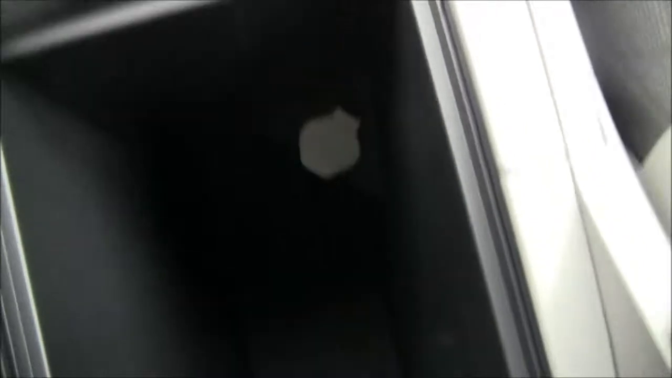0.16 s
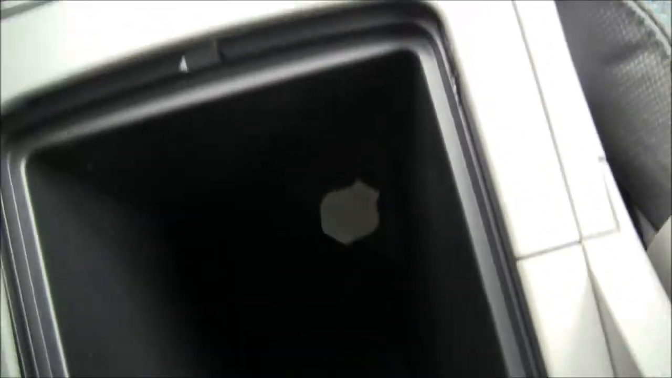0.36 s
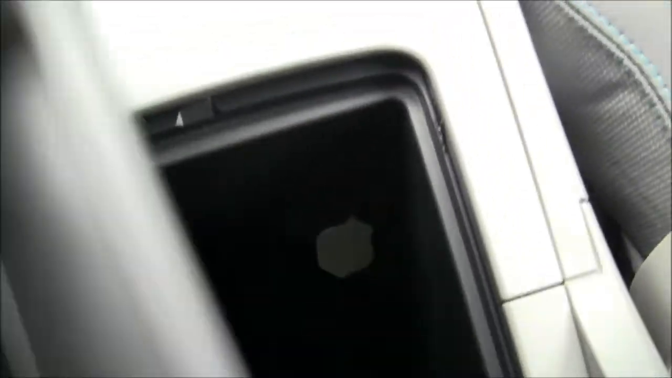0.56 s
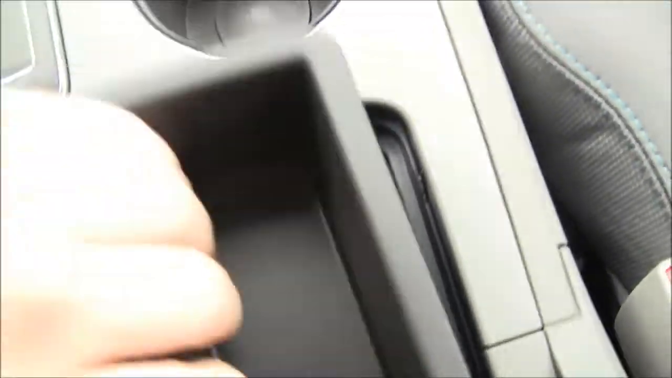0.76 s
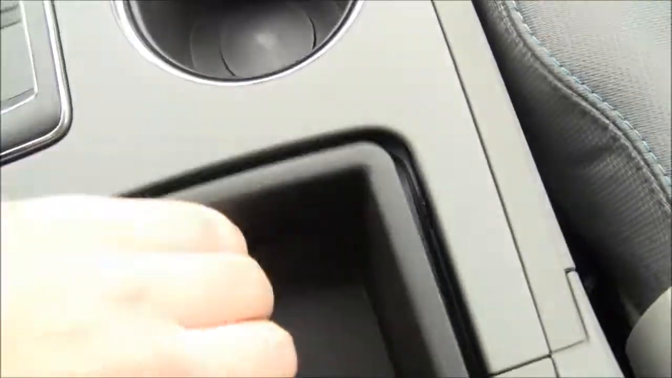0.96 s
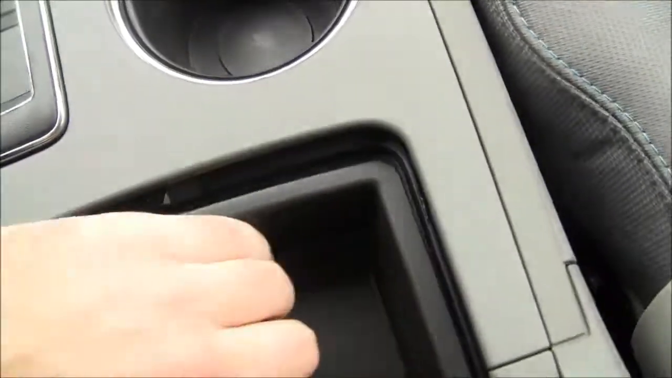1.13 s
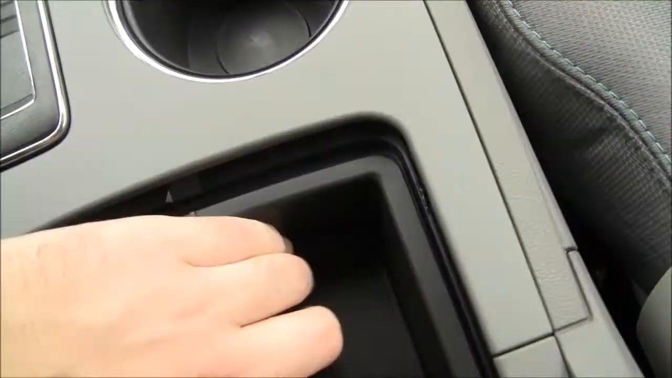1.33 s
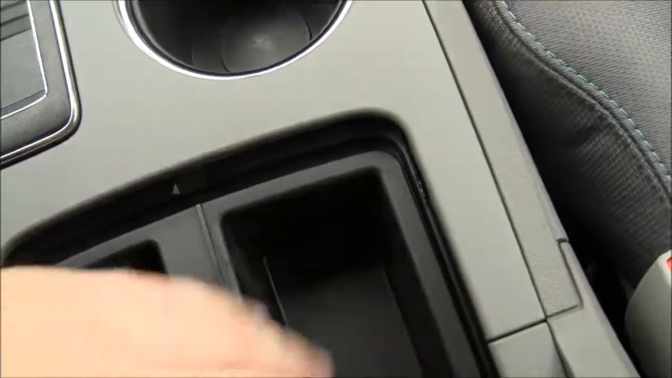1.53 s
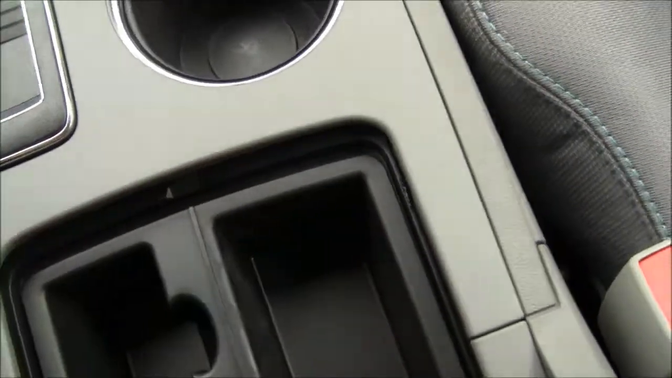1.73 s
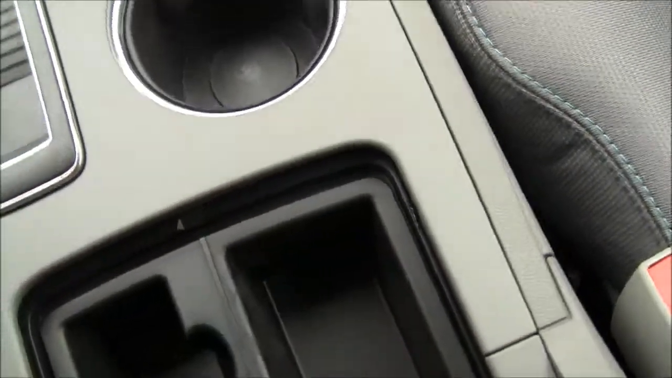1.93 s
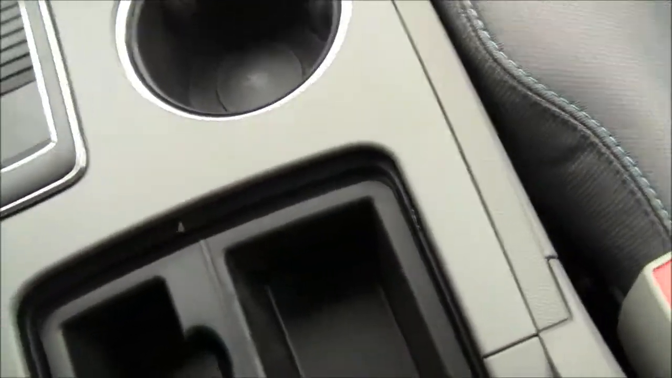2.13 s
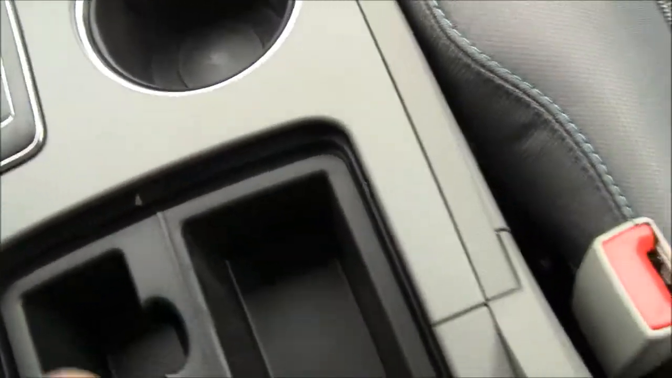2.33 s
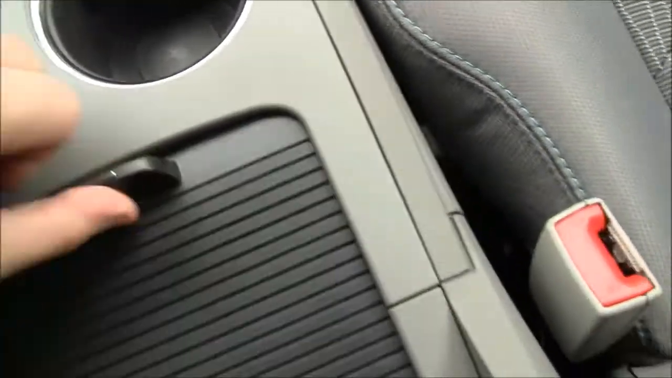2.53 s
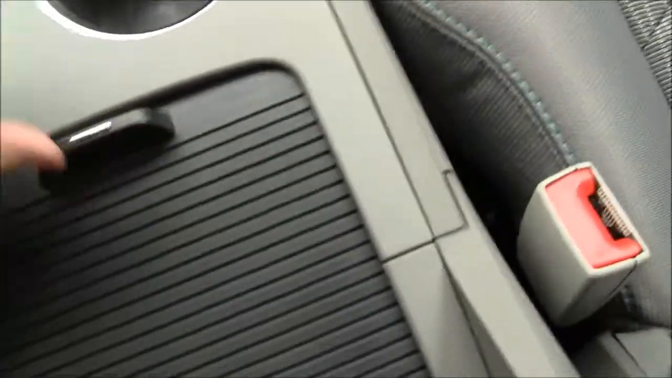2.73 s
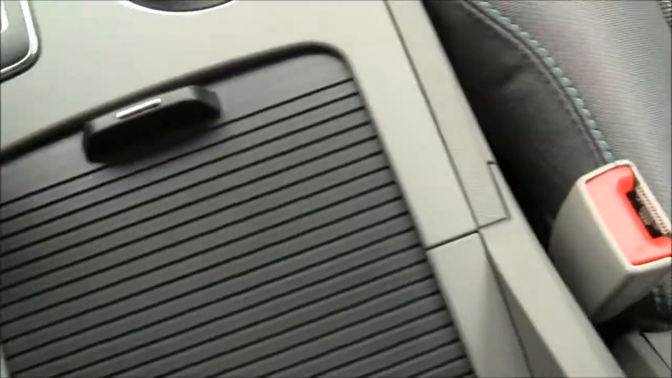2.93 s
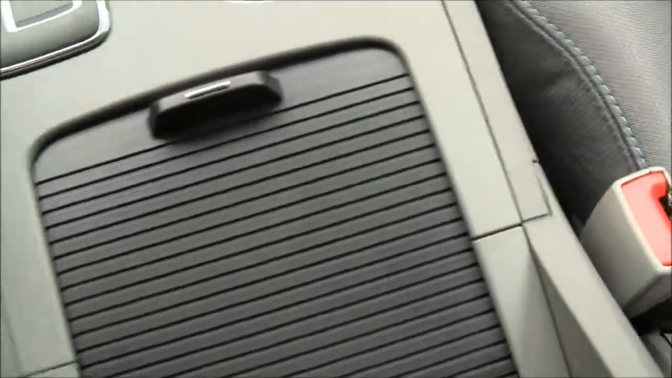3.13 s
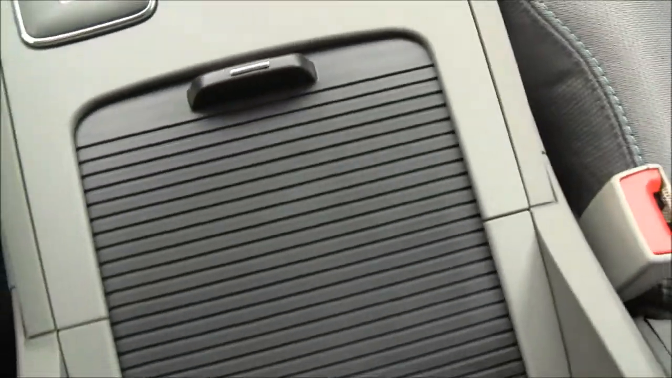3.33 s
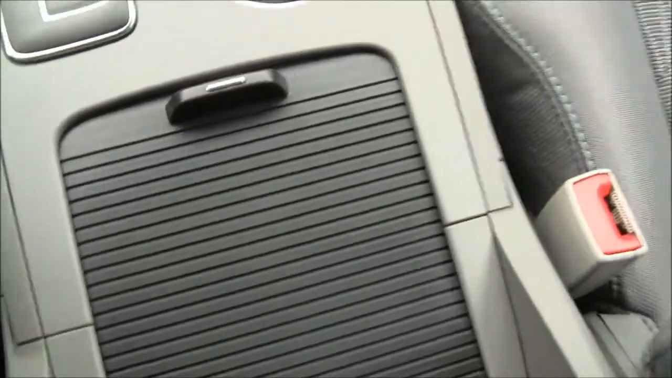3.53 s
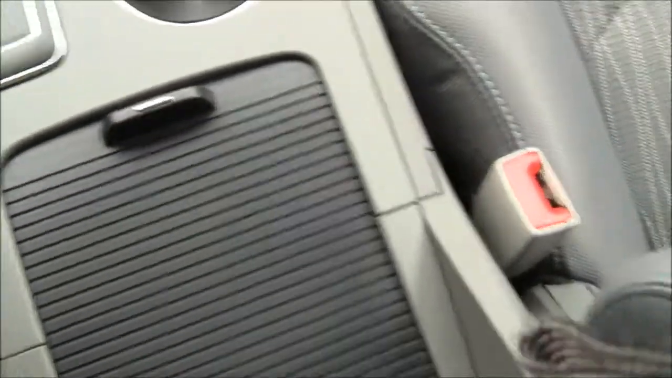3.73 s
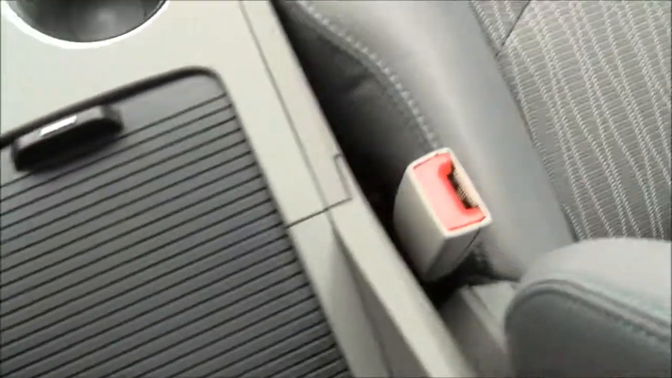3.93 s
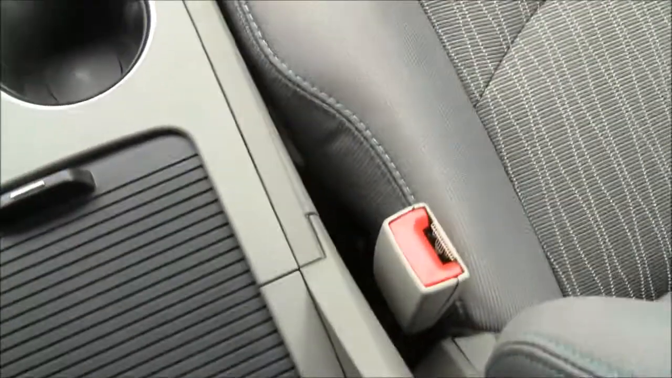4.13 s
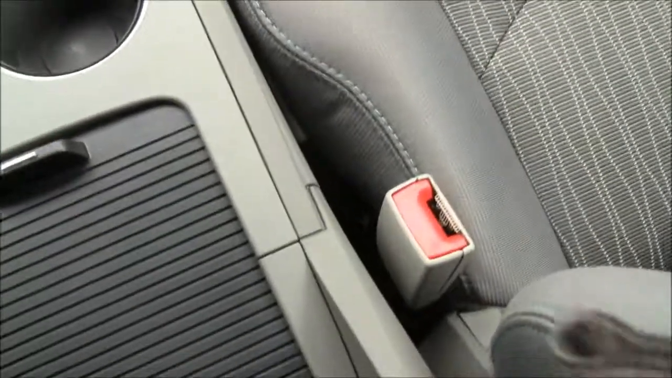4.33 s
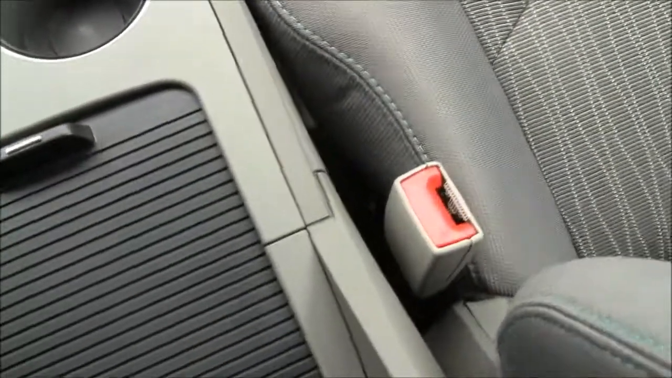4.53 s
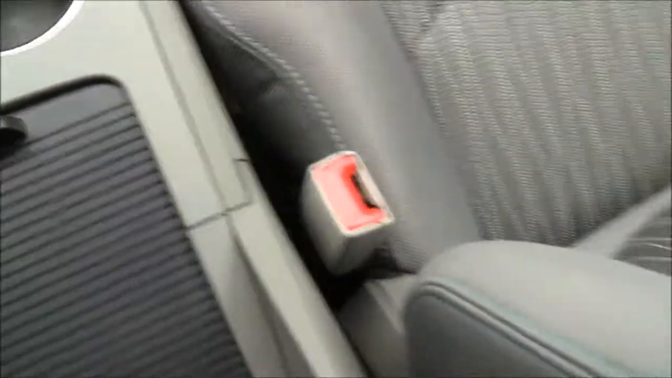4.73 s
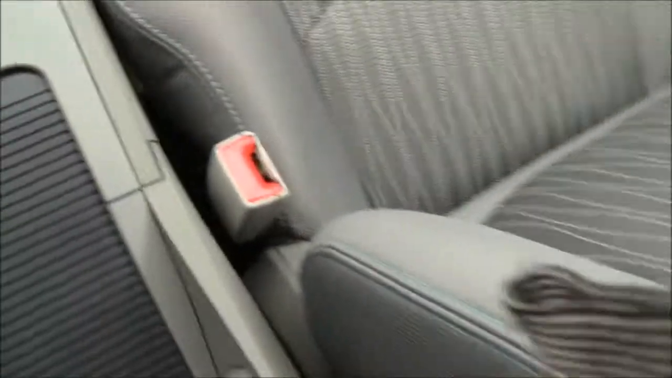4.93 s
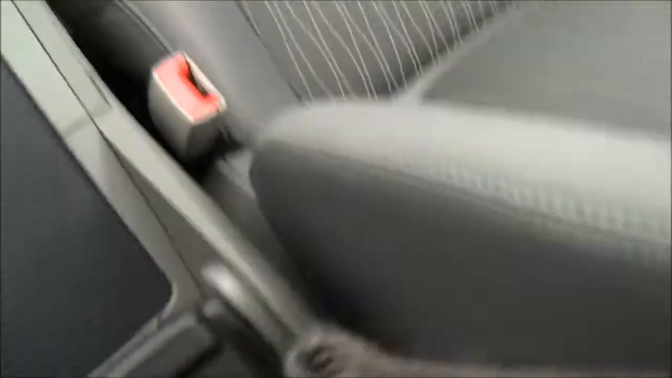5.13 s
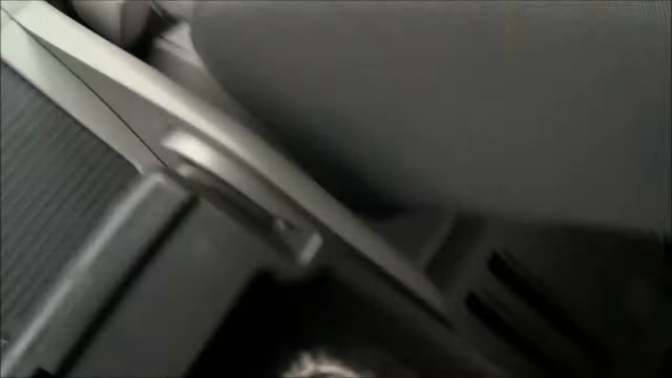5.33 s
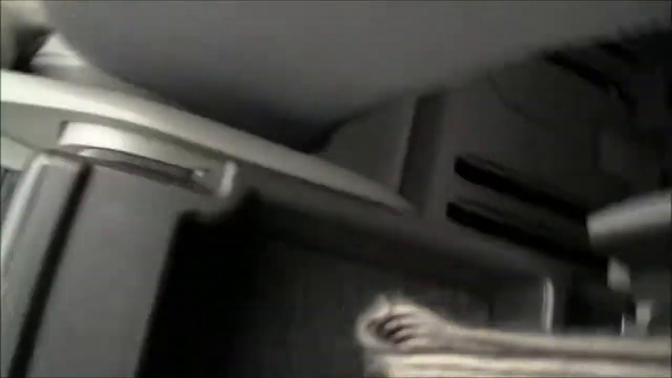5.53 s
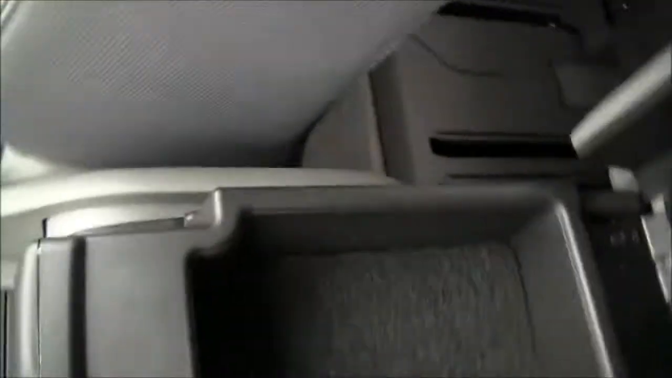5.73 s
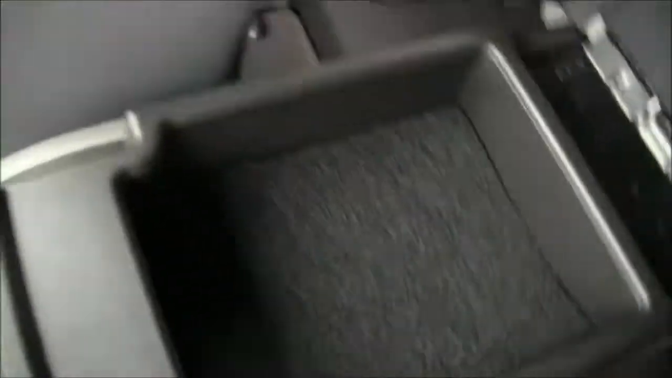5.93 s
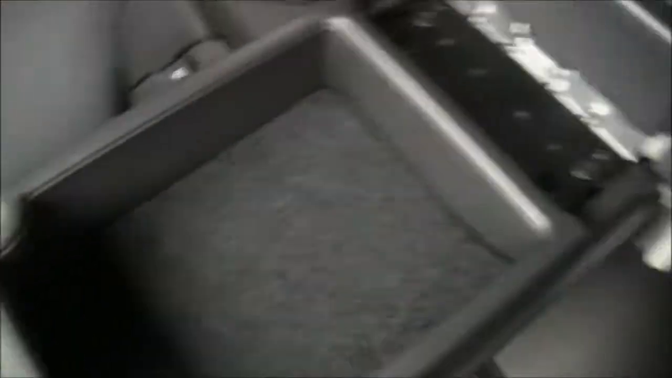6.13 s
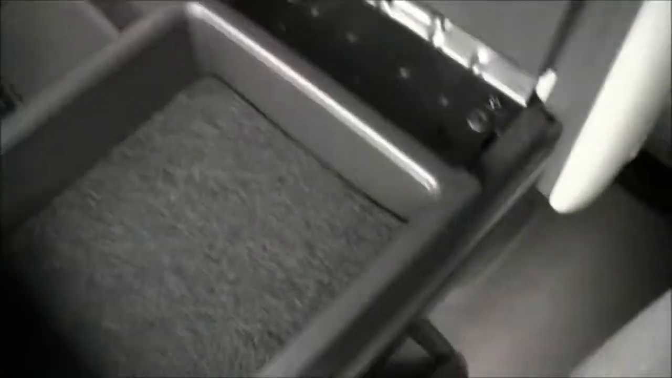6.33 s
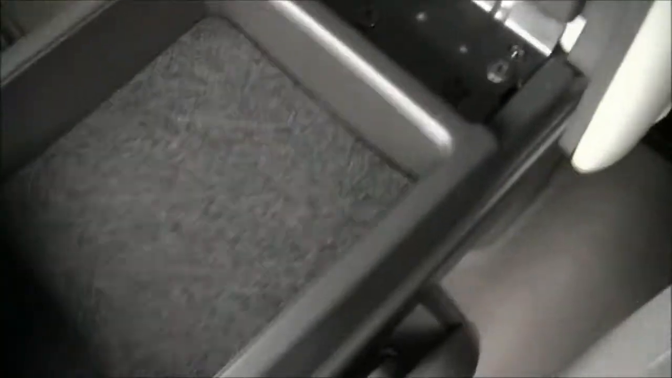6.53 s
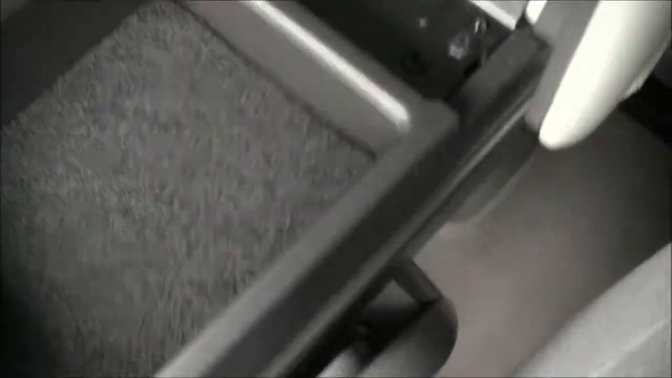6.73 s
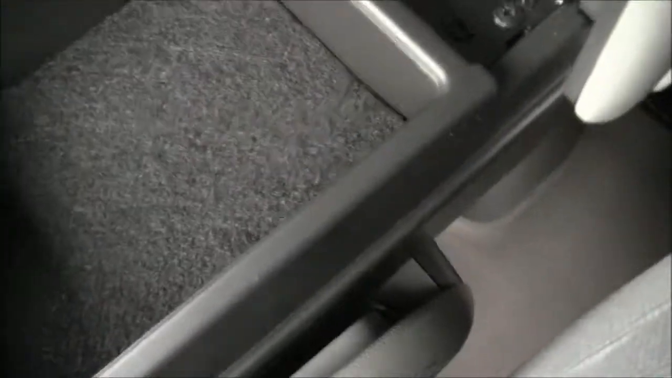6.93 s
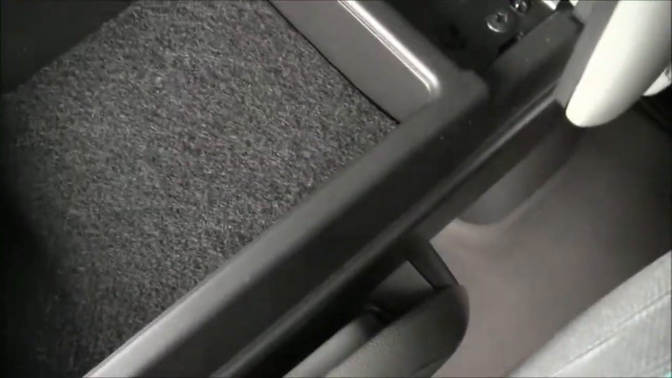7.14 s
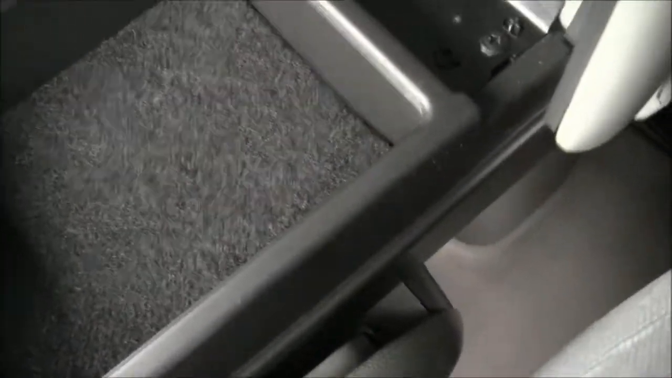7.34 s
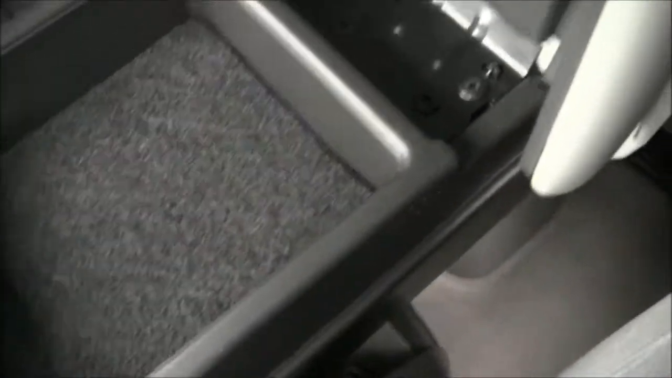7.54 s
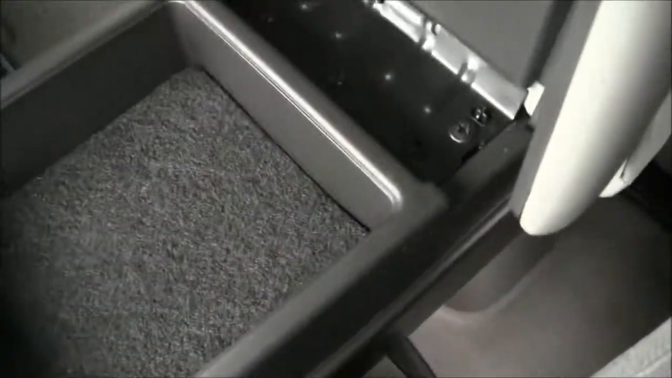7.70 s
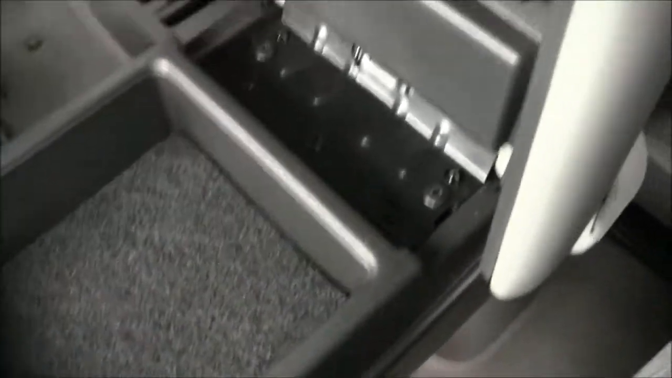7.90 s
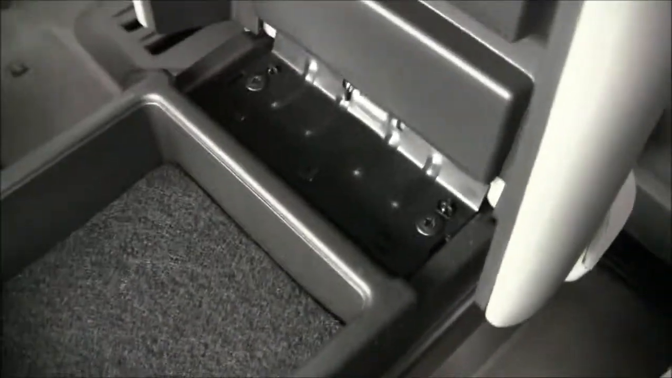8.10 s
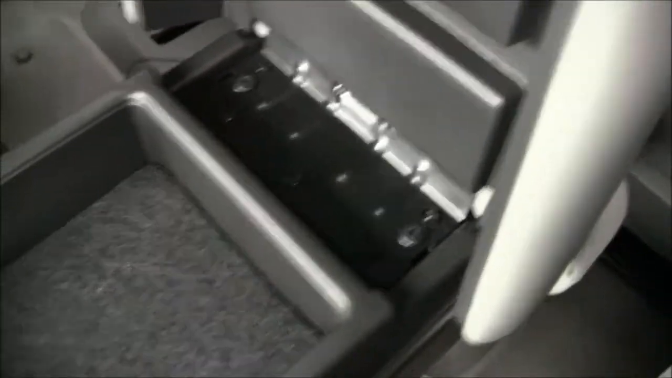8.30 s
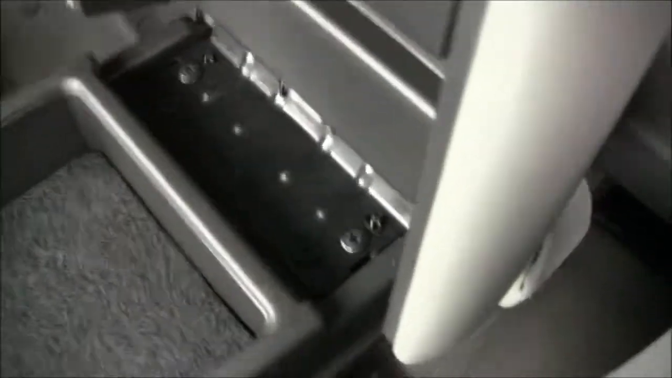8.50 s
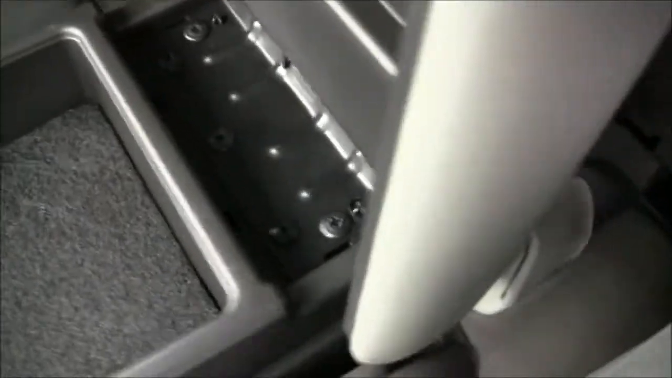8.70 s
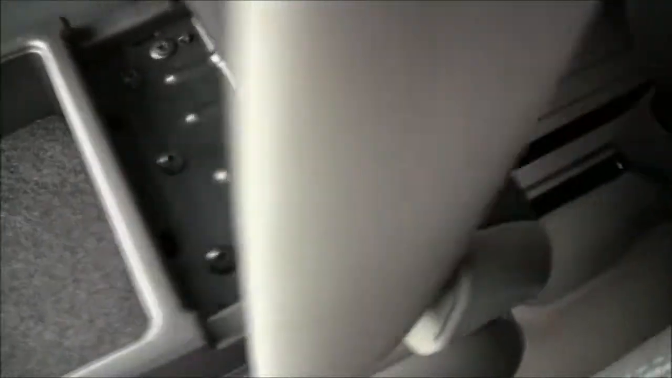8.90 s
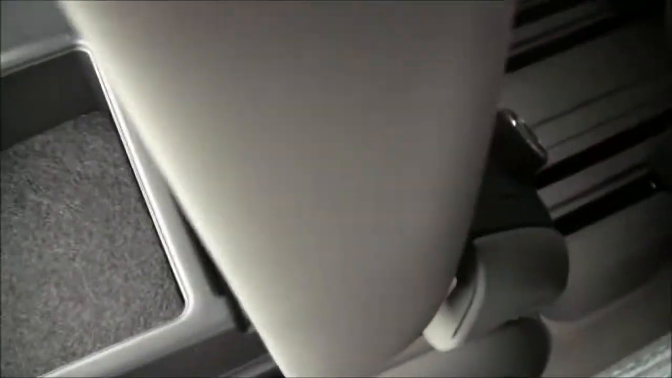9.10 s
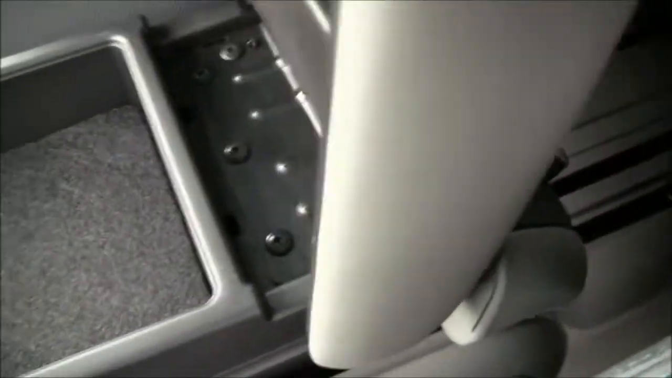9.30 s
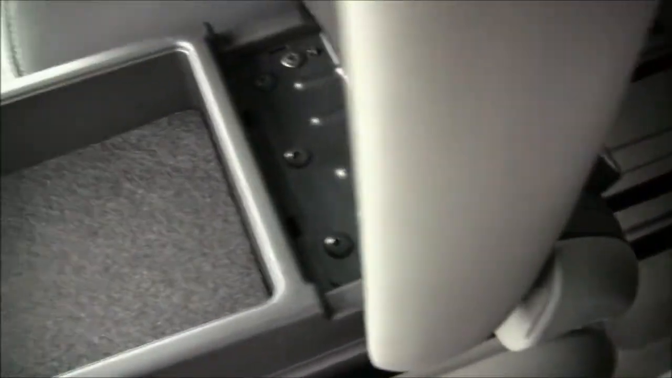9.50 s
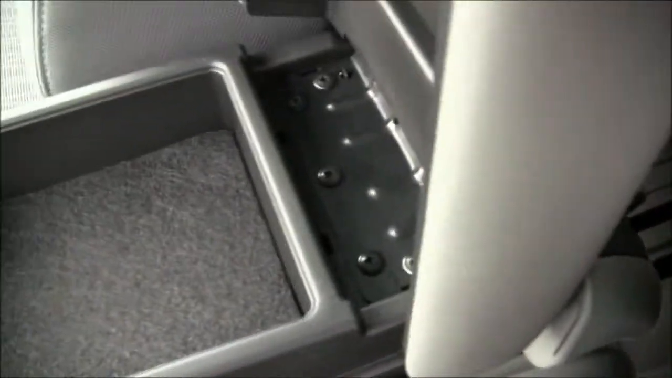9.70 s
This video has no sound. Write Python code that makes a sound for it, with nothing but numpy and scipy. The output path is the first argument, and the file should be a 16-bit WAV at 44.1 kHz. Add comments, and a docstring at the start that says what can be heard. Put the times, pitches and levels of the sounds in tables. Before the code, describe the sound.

Inside a quiet parked car, close to the microphone, a hollow plastic tray clatters and scrapes into its bin. A ribbed shutter then slides with a quick rising rattle and knocks shut. A latch snaps open with a faint springy ring, a sleeve brushes soft upholstery, and finally the armrest hinge grinds and creaks back to a heavy thud. A low, steady cabin hum continues underneath.

```python
"""A plastic centre console in a parked car, worked by hand over the low hum of the cabin.
A tray drops into its bin and is pushed home, a ribbed shutter is drawn shut, the armrest latch snaps open
and the armrest grinds back on its hinge to its stop, while a sleeve brushes the upholstery.
Blows ring panel modes with a noisy crack; rubbing is a rain of random slips into resonances;
the hum is coloured noise, and the latch spring sings in decaying sines."""
import sys
import numpy as np
from scipy import signal
from scipy.fft import rfft, irfft, next_fast_len
from scipy.io import wavfile
from scipy.ndimage import uniform_filter1d

SR = 44100
rng = np.random.default_rng(int(sys.argv[2]) if len(sys.argv) > 2 else 0)


def waveform_to_disk(signal):
    """Save audio, clipped to [-1, 1], as 16-bit WAV at the path in sys.argv[1]."""
    frames = np.transpose(np.atleast_2d(signal))
    scaled = np.clip(frames, -1, 1) * 32767
    samples = np.round(scaled).astype(np.int16)
    wavfile.write(sys.argv[1], SR, samples)


N = 434826
TIME = np.arange(N) / SR


def from_db(db):
    """Decibels to gain."""
    return np.exp(np.asarray(db) * (np.log(10) / 20))


def rms_one(x):
    """Scale to unit power."""
    return x / np.sqrt(np.mean(x ** 2) + 1e-20)


def colour(x, spectrum):
    """Shape a sound by a spectrum whose points are joined on a log-frequency axis."""
    size = next_fast_len(len(x))
    hz = np.maximum(np.fft.rfftfreq(size, 1 / SR), 1)
    points_hz, points_db = np.transpose(spectrum)
    db = np.interp(np.log(hz), np.log(points_hz), points_db)
    return irfft(rfft(x, size) * from_db(db), size)[:len(x)]


def band(x, edges, kind):
    """Causal Butterworth filter."""
    return signal.sosfilt(signal.butter(2, edges, kind, fs=SR, output="sos"), x)


def peak(x, hz, width_hz):
    """Pass one narrow resonance."""
    return signal.lfilter(*signal.iirpeak(hz, hz / width_hz, fs=SR), x)


def resonate(x, resonances):
    """Lift a few resonances out of a sound."""
    return x + sum(from_db(db) * peak(x, hz, width_hz) for hz, width_hz, db in resonances)


def drift(per_s):
    """Random wander: normally distributed points, joined by straight lines."""
    knots = rng.standard_normal(4096)
    return np.interp(TIME * per_s, np.arange(len(knots)), knots)


def gate(start, end, attack_s, release_s):
    """Rise from the start, hold until the end, then die away."""
    rise = (TIME - start) / max(attack_s, 1e-3)
    fall = 1 - (TIME - end) / max(release_s, 1e-3)
    return np.clip(np.minimum(rise, fall), 0, 1)


def push(start, end, attack_s, release_s, first_db, last_db):
    """Gain of a slide whose level runs steadily in dB until it is stopped."""
    return gate(start, end, attack_s, release_s) * from_db(np.interp(TIME, [start, end], [first_db, last_db]))


def ring(s, hz, db, t60):
    """One mode, struck once: a sine that decays exponentially."""
    t = np.clip(TIME - s, 0, 1)
    return from_db(db - 60 * t / t60) * np.sin(2 * np.pi * hz * t)


# The crowd of short, high panel modes in a blow. Each row: frequency in Hz, relative level in dB.
CRACK = [(100, -33), (400, 5.5), (1000, 0.5), (2000, -3), (4000, -7.5), (7000, -13.5), (11000, -21),
         (16000, -26.5)]


def blows(hits, modes, crack_db, crack_t60, chatter_db, thump_db, knock_db, tick_db, swell_cycles,
          contact_db, contact_s=0.00033):
    """Each blow rings the part's modes and a short crack; how hard and sharp it is sets thump, knock and tick."""
    t = TIME[:SR // 3]
    hz, mode_db, t60 = np.transpose(modes)[:, :, None]
    # a panel mode takes a moment to take up the blow
    swell = 1 - np.exp(-t * hz / swell_cycles)
    rings = from_db(mode_db - 60 * t / t60) * np.sin(2 * np.pi * hz * t) * swell
    signs = (-1) ** np.arange(len(modes))[:, None]
    # the crack dies fast and leaves a faint tail in the padded cabin
    dying = from_db(-60 * t / crack_t60) + from_db(-28 - 60 * t / .11)
    crowd = rms_one(colour(rng.standard_normal(SR), CRACK))
    # the first contact itself is one short push and its rebound
    contact = from_db(contact_db) * band(t / contact_s * np.exp(1 - t / contact_s), 500, "high")
    out = np.zeros(N + len(t))
    for s, thump, knock, tick, chatter_s, spot_hz in hits:
        strengths = signs * from_db(rng.normal(0, 1.5, signs.shape))
        # loose plastic buzzes against its seat for a moment after the first contact
        chatter = from_db(chatter_db) * np.exp(-t / max(chatter_s, 1e-4))
        crack = np.roll(crowd, rng.integers(SR))[:len(t)] * (from_db(crack_db) * dying + chatter)
        # the spot that is hit favours a resonance of its own
        body = resonate((strengths * rings).sum(0) + crack + contact, [(spot_hz, 110, 4)])
        parts = band(body, [50, 430], "band"), -band(body, [480, 1700], "band"), band(body, 2000, "high")
        levels = thump + thump_db, knock + knock_db, tick + tick_db
        for part, db in zip(parts, levels):
            # levelled by its first 25 ms
            out[round(s * SR):][:len(t)] += from_db(db) * part / np.std(part[:SR // 40])
    return out[:N]


def rub(gain, spectrum, resonances, slips_per_s, spread_db, judder_db):
    """Friction: a dense rain of tiny slips of uneven size into the part's resonances, under an unsteady hand."""
    moving, out = np.flatnonzero(gain), np.zeros(N)
    slips = rng.standard_normal(N) * (rng.random(N) < slips_per_s / SR)
    slips = slips[moving] * from_db(spread_db * np.minimum(rng.exponential(1, N)[moving], 4))
    rubbing = rms_one(resonate(colour(slips, spectrum), resonances))
    out[moving] = rubbing * from_db(judder_db * drift(90)[moving])
    return gain * out


def grit(gain, spectrum, resonances, catches_per_s, spread_db, crumble_s):
    """Stick and slip: the part catches at uneven intervals and lets go with a short crunch."""
    start, stop = np.flatnonzero(gain)[[0, -1]]
    gaps, sizes = rng.uniform(.3, 1.7, 200), rng.uniform(-1, 1, 200)
    at = (np.cumsum(gaps) / catches_per_s * SR).astype(int)
    catches, out = np.zeros(stop - start), np.zeros(N)
    inside = at < len(catches)
    catches[at[inside]] = from_db(spread_db * sizes[inside])
    decay = np.exp(-1 / (max(crumble_s, 1e-4) * SR))
    crunch = signal.lfilter([1], [1, -decay], catches) * rng.standard_normal(len(catches))
    out[start:stop] = rms_one(resonate(colour(crunch, spectrum), resonances))
    return gain * out


def glide(x, path, resonances):
    """Resonances (ratio, width Hz, dB) that move together along a path of (s, Hz), at the input's power."""
    out, size = np.zeros(N), SR // 800
    start, stop = np.flatnonzero(x)[[0, -1]]
    for ratio, width_hz, db in resonances:
        state = np.zeros(2)
        for i in range(start, stop + SR // 20, size):
            hz = ratio * np.interp(i / SR, *np.transpose(path))
            block, state = signal.lfilter(*signal.iirpeak(hz, hz / width_hz, fs=SR), x[i:i + size], zi=state)
            out[i:i + size] += from_db(db) * block
    return out * np.std(x) / np.std(out)


# Colour of the cabin. Each row: frequency in Hz, relative level in dB.
CABIN = [(15, -54), (25, -23.5), (92, -3), (236, -4), (301, -6), (363, -10), (420, -7), (516, -11.5),
         (734, -18), (988, -17.5), (2220, -30), (2690, -36.5), (3430, -40), (4370, -46.5), (16000, -52)]
# Resonances of the cabin. Each row: frequency in Hz, width in Hz, lift in dB.
CABIN_RES = [(152, 75, -8), (302, 22, -48)]


def cabin_hum(level_db=-42):
    """A steady low rush of air and machinery in the closed cabin: coloured noise."""
    return from_db(level_db) * rms_one(resonate(colour(rng.standard_normal(N), CABIN), CABIN_RES))


# Sleeve strokes. Each row: start in seconds, swell in seconds, hold in seconds, level in dB.
STROKES = [(1.24, 0.046, 0.11, -51), (1.673, 0.17, 0.41, -52), (3.298, 0.38, 0.15, -54),
           (3.917, 0.027, 0.0082, -52.5), (4.428, 0.11, 0.89, -49.5), (4.86, .03, 0.31, -48.5),
           (5.22, 0.19, 0.16, -43), (5.603, 0.12, 0.15, -50), (6.04, 0.45, 0.29, -52),
           (6.737, 0.44, 0.66, -39), (7.27, 0.12, 0.036, -40), (9.486, 0.26, .1, -48.5)]
# Colour of the cloth. Each row: frequency in Hz, relative level in dB.
CLOTH = [(140, -51), (240, -10), (296, -6.5), (366, -1), (460, -9), (548, -10.5), (739, -9), (866, -9.5),
         (2010, -19), (5670, -26.5), (12300, -38), (14900, -41.5), (16000, -46)]
# Resonance of the cloth. Each row: frequency in Hz, width in Hz, lift in dB.
CLOTH_RES = [(301, 65, -2)]


def sleeve(release_s=0.15, rest_db=-58.5):
    """Fibres slip over the upholstery in strokes; the cloth never lies quite still."""
    power = from_db(rest_db) ** 2
    for s, swell_s, hold_s, db in STROKES:
        power = power + (from_db(db) * gate(s, s + swell_s + hold_s, swell_s, release_s)) ** 2
    return rub(np.sqrt(power), CLOTH, CLOTH_RES, slips_per_s=25000, spread_db=1.0, judder_db=1.0)


# Blows of the tray. Each row: time in seconds, thump, knock and tick in dB before the part's trims,
# chatter decay in seconds, resonance of the struck spot in Hz.
TRAY_HITS = [(0.8555, -48, -16, -24.5, 0.0045, 776), (0.8612, -33, -26.5, -34, .002, 790),
             (0.865, -10.5, -45, -48, .0015, 724), (0.9112, -31, -26, -45, 0.00065, 680),
             (0.955, -48, -51, -58, .0015, 1300), (0.978, -48, -41.5, -60, .004, 895),
             (0.9985, -35, -36.5, -39, 0.0051, 930), (1.033, -37, -31, -56, 0.0025, 895),
             (1.0712, -28, -22, -42, .002, 920), (1.079, -22, -27, -46, .002, 880),
             (1.0865, -28, -18.5, -39, .001, 915), (1.095, -32, -27, -41, .0015, 1280),
             (1.102, -18.5, -17, -32.5, 0.001, 950), (1.1068, -26, -27, -41, .001, 1260),
             (1.116, -38, -45, -57, .001, 250), (1.136, -27, -49, -60, 0.0015, 890),
             (1.1562, -27, -29.5, -57, 0.00055, 850), (1.3054, -31, -33, -49.5, 0.0014, 660)]
# What the tray rings with. Each row: frequency in Hz, relative level in dB, 60 dB decay in seconds.
TRAY_MODES = [(120, 3, .045), (213, 13, 0.09), (282, 10, 0.06), (365, 1, .05), (445, 2, 0.04),
              (655, 2, 0.045), (778, 6, 0.045), (921, 6, 0.065), (1280, -1, 0.06), (1400, -3, 0.04),
              (1760, 0, 0.04), (1920, -2, .035), (2430, -1, 0.036), (3870, -4, 0.032)]
# A short low push under the tray's loud knock: time in seconds, frequency in Hz, level in dB,
# 60 dB decay in seconds.
LOW_PUSH = (1.0995, 62, -16, 0.028)


def tray_blows():
    """The tray strikes its bin and rings, with a short low push under its loud knock."""
    hits = blows(TRAY_HITS, TRAY_MODES, crack_db=7.5, crack_t60=0.037, chatter_db=13.5, thump_db=-5.5,
                 knock_db=0.5, tick_db=-2.0, swell_cycles=0.33, contact_db=22.5)
    return hits + ring(*LOW_PUSH)


# The push home: start, end, attack and release in seconds, first and last level in dB before binding.
TRAY_PUSH = (.912, 1.11, .015, .05, -40.5, -34.5)
# The tray binds on the way in. Each row: time in seconds, half-length in seconds, extra level in dB.
TRAY_BINDS = [(1.003, .012, 6), (1.075, .012, 4)]
# Colour of the rubbing. Each row: frequency in Hz, relative level in dB.
TRAY_RUB = [(110, -14), (180, 3.5), (293, 3.5), (622, -14), (905, -7), (1110, -22), (1680, -13),
            (2360, -14), (3240, -16), (3500, -22), (5700, -20), (6750, -30), (7990, -23), (8610, -28),
            (16000, -38)]
# Resonances of the rubbing. Each row: frequency in Hz, width in Hz, lift in dB.
TRAY_RES = [(875, 120, -1), (1350, 180, 7), (1720, 130, -11)]
# Coarse grit caught in the guides. Each row: frequency in Hz, relative level in dB.
TRAY_GRIT = [(150, -14), (400, -3), (1300, 6), (2400, -15), (6000, -15), (16000, -34)]
# Resonances of the grit. Each row: frequency in Hz, width in Hz, lift in dB.
TRAY_GRIT_RES = [(890, 110, 21), (1270, 150, 3), (3200, 110, 19)]


def tray_slide(grit_db=-5):
    """The tray scrapes along its guides, with crunches of grit, and swells where it binds."""
    binding = from_db(sum(db * np.exp(-((TIME - s) / half_s) ** 2) for s, half_s, db in TRAY_BINDS))
    pushing = push(*TRAY_PUSH) * binding
    scrape = rub(pushing, TRAY_RUB, TRAY_RES, slips_per_s=7600, spread_db=-2.0, judder_db=-0.5)
    crunches = grit(pushing * from_db(grit_db), TRAY_GRIT, TRAY_GRIT_RES,
                    catches_per_s=100, spread_db=10, crumble_s=0.0034)
    return scrape + crunches


# Fingers over smooth plastic. Each row: start in seconds, length in seconds, level in dB.
SWISHES = [(1.21, 0.018, -57.5), (1.292, 0.13, -59), (3.76, .02, -64), (3.958, 0.036, -62),
           (4.177, 0.037, -62), (4.484, 0.03, -59), (4.866, 0.082, -53), (6.45, .07, -62)]
# Colour of the skin. Each row: frequency in Hz, relative level in dB.
SKIN = [(500, -8), (3000, 5.5), (7000, -1), (16000, -3.5)]


def swishes(attack_s=0.014, release_s=0.032):
    """Skin on smooth plastic gives a short, bright hiss."""
    gain = sum(from_db(db) * gate(s, s + length_s, attack_s, release_s) for s, length_s, db in SWISHES)
    return rub(gain, SKIN, [], slips_per_s=20000, spread_db=2.5, judder_db=2.5)


# Blows of the shutter. Each row: time in seconds, thump, knock and tick in dB before the part's trims,
# chatter decay in seconds, resonance of the struck spot in Hz.
SHUTTER_HITS = [(1.965, -56, -40.5, -58, 0.011, 745), (1.976, -27, -66, -45.5, 0.004, 880),
                (2.0708, -47, -31, -44, 0.014, 706), (2.09, -28, -39, -59, 0.012, 720),
                (2.4565, -16, -45, -29.5, 0.0039, 530), (2.462, -14.5, -22.5, -19, 0.0018, 260),
                (2.473, -18, -22.5, -47, .0034, 600), (2.56, -64, -62, -50, 0.0037, 1700)]
# What the shutter rings with. Each row: frequency in Hz, relative level in dB, 60 dB decay in seconds.
SHUTTER_MODES = [(110, 6, 0.05), (199, 13, 0.07), (266, 7, 0.08), (445, 2, .05), (510, 4, 0.05),
                 (590, 3, .05), (807, -1, 0.08), (1030, -4, .04), (1320, -4, .035), (1650, -10, 0.06),
                 (3550, -1, .03), (3850, 0, 0.032), (5440, -9, 0.035)]
# The catch drops in: time in seconds, frequency in Hz, level in dB, 60 dB decay in seconds.
CATCH_RING = (2.56, 1668, -37, 0.06)


def shutter_blows():
    """The shutter is struck and rings; its catch drops in and rings."""
    hits = blows(SHUTTER_HITS, SHUTTER_MODES, crack_db=-6.5, crack_t60=0.092, chatter_db=9.0, thump_db=-6,
                 knock_db=-2.5, tick_db=-0.5, swell_cycles=0.32, contact_db=9)
    return hits + ring(*CATCH_RING)


# The pull: start, end, attack and release in seconds, first and last level in dB.
SHUTTER_PULL = (2.176, 2.455, .02, .033, -36.5, -28)
# Colour of the rubbing, also used by the latch. Each row: frequency in Hz, relative level in dB.
SHUTTER_RUB = [(100, -28), (150, -0.5), (213, -2), (440, -17.5), (730, -4), (1100, -9.5), (2450, -17.5),
               (2980, -15.5), (5460, -22), (7180, -23), (12400, -29), (16000, -32)]
# Resonances of the rubbing. Each row: frequency in Hz, width in Hz, lift in dB.
SHUTTER_RES = [(680, 68, -0.5), (3000, 110, -6), (3780, 70, -12), (5330, 55, -5)]


def shutter_slide():
    """The shutter rubs along its track."""
    pulling = push(*SHUTTER_PULL)
    return rub(pulling, SHUTTER_RUB, SHUTTER_RES, slips_per_s=12000, spread_db=1.0, judder_db=-0.5)


# The thin note of the runners. Each row: time in seconds, frequency in Hz.
RUNNER_NOTE = [(2.22, 6740), (2.32, 7370), (2.39, 7100), (2.455, 6650)]
# Its resonances. Each row: ratio to the note, width in Hz, relative level in dB.
RUNNER_RES = [(.43, 110, -13), (.55, 90, -13), (.89, 100, -2), (1, 250, 1), (1.19, 120, -4)]


def runners(level_db=-8.5):
    """The shutter's edges hiss in their grooves, with narrow resonances that rise and fall during the pull."""
    return from_db(level_db) * glide(rng.standard_normal(N) * push(*SHUTTER_PULL), RUNNER_NOTE, RUNNER_RES)


def ribs(per_s=107, unevenness=.35, depth_db=6):
    """Gain that pulses as each rib of the shutter catches on the lip of the track and runs on."""
    passed = np.cumsum(per_s * (1 + unevenness * drift(40))) / SR
    return from_db(depth_db * (1 - 2 * (passed % 1)))


# Slats chattering over the bin. Each row: start, end, attack and release in seconds,
# first and last level in dB.
SLAT_RUNS = [(2.25, 2.298, .022, .01, -25, -24), (2.351, 2.455, .008, .015, -24, -24.5)]
# The hollow's note rises, then sinks as the opening closes. Each row: time in seconds, frequency in Hz.
SLAT_NOTE = [(2.3, 690), (2.37, 830), (2.4, 760), (2.435, 540), (2.475, 480)]
# Resonances of the hollow. Each row: ratio to its note, width in Hz, relative level in dB.
SLAT_RES = [(1, 100, 0), (1.4, 130, -5.5), (1.95, 170, -13), (4.6, 1500, -23)]


def slats(knocks_per_s=2500):
    """The shutter's slats tap along the track into a hollow whose moving resonances they excite."""
    gain = sum(push(*run) for run in SLAT_RUNS)
    taps = rng.choice([-1, 1], N) * (rng.random(N) < knocks_per_s / SR)
    taps = rms_one(taps * ribs())
    return band(glide(taps * gain, SLAT_NOTE, SLAT_RES), 400, "high")


# What latch and trim ring with. Each row: frequency in Hz, relative level in dB, 60 dB decay in seconds.
LATCH_MODES = [(308, 12, .06), (345, 2, .06), (430, -1, .045), (570, -9, .04), (860, -2, .035),
               (1010, 2, .035), (1400, -1, .028), (1650, 1, .028), (1800, 1, .03), (2450, -5, .03),
               (2950, -5, .02), (3500, -5, .02), (4080, -3, .022), (5350, -6, .035)]


def strike_latch(hits):
    """Blows to the latch housing and the trim around it."""
    return blows(hits, LATCH_MODES, crack_db=-4.0, crack_t60=0.042, chatter_db=12.0, thump_db=-2.0,
                 knock_db=0.5, tick_db=-2.5, swell_cycles=1.0, contact_db=16.0)


# Light, dull bumps of the hand on the trim. Each row: time in seconds, thump in dB before the trims.
BUMPS = [(2.623, -40.5), (4.294, -39), (4.453, -43), (4.498, -40), (4.535, -35.5), (5.455, -40.5),
         (5.619, -44), (5.83, -39), (6.161, -40.5), (6.177, -44), (6.727, -46)]


def hand_bumps():
    """The hand bumps the trim; knock and tick keep a fixed distance below the thump."""
    chatter_s, spot_hz = 0.018, 1120
    return strike_latch([(s, db, db - 16.5, db - 16, chatter_s, spot_hz) for s, db in BUMPS])


# Blows of the latch. Each row: time in seconds, thump, knock and tick in dB before the part's trims,
# chatter decay in seconds, resonance of the struck spot in Hz.
LATCH_HITS = [(4.368, -47, -26.5, -32, 0.0014, 1380), (4.3697, -15, -19.5, -16.5, 0.00066, 976),
              (4.391, -48, -35, -59, 0.0032, 690), (4.5512, -29, -39.5, -43, 0.004, 2480),
              (4.6197, -44, -38, -33.5, 0.0078, 2500), (4.623, -19, -39, -43, 0.0025, 350),
              (4.633, -43, -42, -32.5, 0.011, 850), (4.639, -35, -29, -31.5, 0.005, 840),
              (4.875, -42, -39, -63, 0.011, 1220), (5.368, -31, -45, -44, 0.007, 423),
              (5.386, -42, -44, -47, 0.0046, 402)]


def latch_blows():
    """The armrest latch snaps open and clatters."""
    return strike_latch(LATCH_HITS)


# Tiny ticks and small high squeaks. Each row: time in seconds, level in dB, ring in Hz.
TICKS = [(4.499, -50, 4600), (4.5617, -38, 2480), (4.685, -50, 3200), (4.708, -50, 4200),
         (4.727, -45, 6000), (4.761, -56, 4000), (4.867, -46, 5430), (5.822, -48, 4170), (6.163, -63, 3800),
         (6.177, -56, 2500), (6.231, -55, 5900), (6.26, -57, 6000), (6.274, -57, 6100), (6.307, -55, 6200),
         (6.437, -54, 1800), (6.73, -48, 4800), (8.219, -43, 2070), (9.284, -57, 4500)]
# Colour of their noise. Each row: frequency in Hz, relative level in dB.
TICK_COLOUR = [(700, -4), (2000, 5), (6000, -13), (10000, -14), (16000, -17)]


def ticks(t60=0.028, width_hz=660, ring_db=11):
    """Tiny ticks and small high squeaks: decaying noise bursts, each with a short ring."""
    out, t = np.zeros(N), TIME[:SR // 10]
    for s, db, hz in TICKS:
        burst = colour(rng.standard_normal(len(t)), TICK_COLOUR) * from_db(-60 * t / t60)
        burst = resonate(burst, [(hz, width_hz, ring_db)])
        # levelled by its first 5 ms
        out[round(s * SR):][:len(t)] += from_db(db) * burst / np.std(burst[:SR // 200])
    return out


# The latch's travel: start, end, attack and release in seconds, first and last level in dB.
LATCH_DRAG = (4.55, 4.65, .05, .125, -47, -44)
# Resonances of its rubbing. Each row: frequency in Hz, width in Hz, lift in dB.
LATCH_RES = [(1160, 150, 2), (2500, 130, 2), (5370, 150, 4)]


def latch_slide():
    """The latch drags in its track with an unsteady scrape."""
    return rub(push(*LATCH_DRAG), SHUTTER_RUB, LATCH_RES, slips_per_s=3000, spread_db=-1.0, judder_db=6.5)


# Flicked as the catch is pressed, as it starts to slip, and as it flies free.
# Each row: time in seconds, gain in dB on the modes.
SPRING_FLICKS = [(4.56, -11), (4.62, -14), (4.638, 5)]
# High spring modes, some in close pairs, and lower rings of the housing.
# Each row: frequency in Hz, level in dB before the flick's gain, 60 dB decay in seconds.
SPRING_MODES = [(849, -19, 0.072), (1115, -31, 0.096), (2400, -37, 0.098), (5000, -45, .16),
                (5400, -52, .14), (5394, -53, 0.15), (6560, -44, 0.15), (6500, -45, 0.11),
                (7000, -48, 0.14)]


def spring():
    """The steel latch spring sings faintly in decaying sines each time it is flicked."""
    out, t = np.zeros(N), TIME[:SR // 2]
    for s, flick_db in SPRING_FLICKS:
        for hz, db, t60 in SPRING_MODES:
            mode = from_db(flick_db + db - 60 * t / t60) * np.sin(2 * np.pi * hz * t)
            out[round(s * SR):][:len(t)] += mode
    return out


# Blows of the armrest. Each row: time in seconds, thump, knock and tick in dB before the part's trims,
# chatter decay in seconds, resonance of the struck spot in Hz.
ARMREST_HITS = [(7.989, -64, -43.5, -45.5, 0.0022, 1090), (8.22, -39, -46, -56, 0.0016, 624),
                (8.9015, -9.5, -19.5, -33, 0.006, 535), (8.919, -23, -31, -61, 0.002, 290),
                (8.948, -40, -44, -65, 0.0022, 580)]
# What the armrest rings with. Each row: frequency in Hz, relative level in dB, 60 dB decay in seconds.
ARMREST_MODES = [(70, -12, 0.2), (120, 3, 0.11), (178, 1, 0.11), (240, 1, .09), (290, 5, 0.083),
                 (400, 10, 0.05), (524, 6, 0.06), (670, 6, 0.045), (845, 1, .044), (1050, -2, .04),
                 (1160, -4, .04), (1550, -7, .045), (1900, -4, 0.04), (2400, -6, 0.045)]


def armrest_blows():
    """The armrest knocks, then hits its stop, ringing its panels."""
    return blows(ARMREST_HITS, ARMREST_MODES, crack_db=0.0, crack_t60=0.11, chatter_db=8.0, thump_db=-3.0,
                 knock_db=1.5, tick_db=-0.5, swell_cycles=0.64, contact_db=10)


# The hinge's creak. Each row: frequency in Hz, width in Hz, level in dB relative to the turn.
CREAK_RES = [(373, 53, -6.5), (510, 50, -8.5), (670, 80, -9.5), (814, 44, -10.5), (910, 73, -9),
             (1064, 130, -14)]


def creak(gain, slips_per_s=1800, spread_db=-1.5, cut_hz=4300):
    """The hinge lets go in tiny slips at random moments; each rings one resonance of the armrest."""
    moving, out = np.flatnonzero(gain), np.zeros(N)
    chance = slips_per_s / len(CREAK_RES) / SR
    for hz, width_hz, db in CREAK_RES:
        slips = (rng.random(len(moving)) < chance) * rng.choice([-1, 1], len(moving))
        slips = slips * from_db(spread_db * rng.uniform(-1, 1, len(moving)))
        out[moving] += from_db(db) * rms_one(peak(slips + 1e-18, hz, width_hz))
    return gain * band(out, cut_hz, "low")


# The turn: start, end, attack and release in seconds, first and last level in dB.
HINGE_TURN = (8.2, 8.905, .03, .05, -41.5, -35)
# Colour of the grinding. Each row: frequency in Hz, relative level in dB.
HINGE_RUB = [(150, -44), (250, 3), (325, -6), (380, 3.5), (452, -11), (519, -4), (698, -15), (816, -5.5),
             (1790, -27), (2240, -27), (4490, -39), (9490, -42.5), (16000, -61)]
# Resonances of the grinding. Each row: frequency in Hz, width in Hz, lift in dB.
HINGE_RES = [(555, 100, 5), (850, 170, -16)]


def hinge_grind():
    """The hinge rubs and creaks, louder towards the stop."""
    turning = push(*HINGE_TURN)
    grinding = rub(turning, HINGE_RUB, HINGE_RES, slips_per_s=1800, spread_db=0.6, judder_db=2.5)
    return grinding + creak(turning)


# The hinge sticks and lets go, harder towards the stop, then settles.
# Each row: time in seconds, knock in dB before the trims, resonance in Hz.
HINGE_SLIPS = [(8.379, -39.5, 580), (8.4, -44, 910), (8.542, -38.5, 530), (8.623, -37.5, 790),
               (8.655, -40, 744), (8.715, -29.5, 610), (8.752, -37, 814), (8.797, -28, 536),
               (8.825, -34, 507), (8.862, -31, 855), (8.887, -29, 504), (9.108, -46, 1210),
               (9.225, -45.5, 910), (9.48, -42.5, 600), (9.543, -49, 1150)]


def hinge_slips(chatter_s=0.0084):
    """Larger slips of the hinge strike the armrest; the tick follows only part of the knock's level."""
    hits = [(s, db - 6.5, db, -33 + .65 * db, chatter_s, hz) for s, db, hz in HINGE_SLIPS]
    return blows(hits, ARMREST_MODES, crack_db=-3.5, crack_t60=0.09, chatter_db=1.5, thump_db=-1,
                 knock_db=1, tick_db=0.5, swell_cycles=1.4, contact_db=11)


# Crowded low modes of the whole console. Each row: frequency in Hz, relative level in dB.
BOOM = [(40, -32), (90, -2), (140, -9), (210, 1), (280, -12), (400, -20), (600, -39), (1500, -70)]
# The few that stand out and ring on. Each row: frequency in Hz, level in dB, 60 dB decay in seconds.
CONSOLE_MODES = [(146.5, -24, 0.31), (190.5, -23.5, 0.39), (220.6, -26, 0.36), (405, -24, 0.19),
                 (540, -32, 0.3)]


def boom(start_s=8.905, level_db=-31, t60=.4, attack_s=0.013):
    """The stop shakes the whole console, which hums on in a few low modes over a dull thud."""
    t = np.clip(TIME - start_s, 0, 2)
    shake = np.resize(rms_one(colour(rng.standard_normal(SR), BOOM)), N)
    modes = sum(ring(start_s, *mode) for mode in CONSOLE_MODES)
    return (modes + shake * from_db(level_db - 60 * t / t60)) * np.minimum(t / attack_s, 1)


# Left-right difference. Each row: frequency in Hz, gain in dB on the wandering side signal.
WIDTH = [(60, -38), (150, -29), (300, -17), (1000, -15), (2000, -12), (4000, -8.5), (8000, -4.5),
         (14000, 1.5)]


def scene():
    """Everything is close and central; the treble reaches the two sides less alike than the bass."""
    tray = tray_blows() + tray_slide()
    shutter = shutter_blows() + shutter_slide() + runners() + slats()
    latch = latch_blows() + latch_slide() + spring()
    armrest = armrest_blows() + hinge_grind() + hinge_slips() + boom()
    hand = sleeve() + swishes() + hand_bumps()
    mid = cabin_hum() + tray + shutter + latch + armrest + hand + ticks()
    side = colour(mid * drift(400), WIDTH)
    return np.array([mid + side, mid - side])


def record(dry, limit_db=0.0, release_db_per_s=130, ceiling=.6, cutoff_hz=16100):
    """A limiter ducks at peaks over its limit and recovers steadily, peaks are rounded and the top is cut."""
    over = np.maximum(20 * np.log10(np.abs(dry).max(0) + 1e-9) - limit_db, 0)
    held = np.maximum.accumulate(over + release_db_per_s * TIME) - release_db_per_s * TIME
    limited = dry * from_db(-uniform_filter1d(held, size=64))
    rounded = limited / (1 + (limited / ceiling) ** 4) ** .25
    return signal.sosfilt(signal.ellip(10, .1, 80, cutoff_hz, fs=SR, output="sos"), rounded)


dry = scene()
out = record(dry)
waveform_to_disk(out)
```